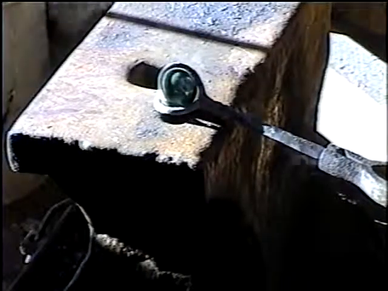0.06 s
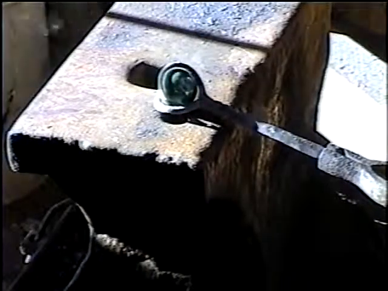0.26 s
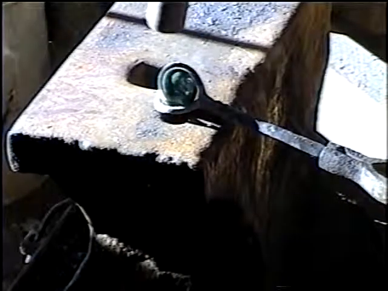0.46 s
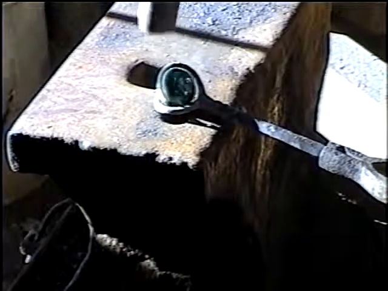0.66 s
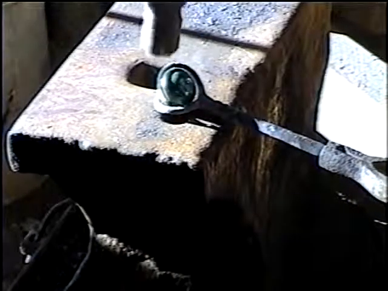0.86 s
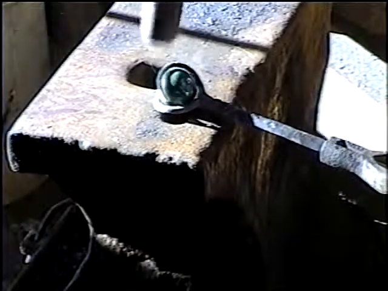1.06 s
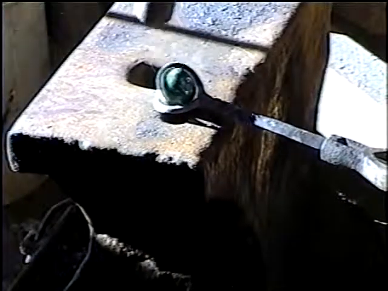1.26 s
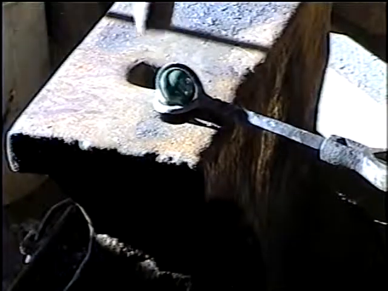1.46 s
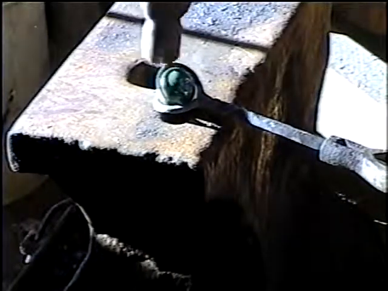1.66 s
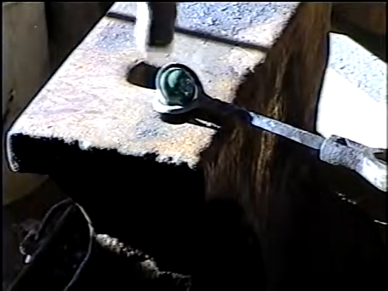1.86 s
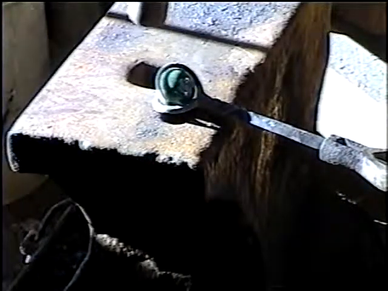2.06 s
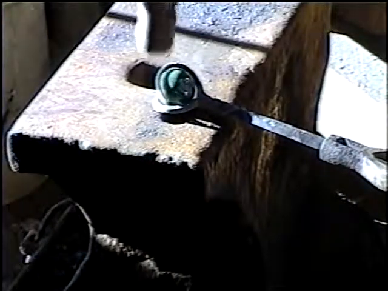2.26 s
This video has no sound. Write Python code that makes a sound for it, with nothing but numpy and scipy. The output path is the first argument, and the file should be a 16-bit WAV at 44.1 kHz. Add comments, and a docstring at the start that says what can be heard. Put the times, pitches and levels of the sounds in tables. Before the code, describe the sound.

Six ringing hammer clacks on a steel piece, with soft drip-like pips behind.

```python
"""A small workshop, heard from a camera microphone with its own hiss, mains hum and thin whine.
From the start, an uneven string of hollow pips near 1 kHz, perhaps water bubbling or dripping, runs
in the background over a low rumble. From 0.7 s a hammer in front taps a steel piece on an anvil six
times: the damped steel clacks, rings briefly and four times rattles back. One dull knock falls
before the last tap, and the pips carry on to the end."""
import sys
import numpy as np
from scipy import signal
from scipy.fft import rfft, irfft, next_fast_len
from scipy.io import wavfile
from scipy.ndimage import map_coordinates

SR = 44100
rng = np.random.default_rng(int(sys.argv[2]) if len(sys.argv) > 2 else 0)


def digitize_waveform(pressure):
    """Quantize a signal to 16-bit integers and store it at the path in sys.argv[1].

    Rows of a 2-D input are taken as channels; values are limited to [-1, 1].
    """
    field = np.atleast_2d(pressure).T
    bounded = np.clip(field, -1, 1)
    quanta = np.round(bounded * 32767).astype(np.int16)
    wavfile.write(sys.argv[1], SR, quanta)


N = 105840

# Spectrum of steel clacking on steel: frequency_hz, level_db
CLACK_SPECTRUM = [(60, -24), (200, -3.5), (400, -3.5), (800, -1), (1280, -5.5), (1750, -4.5), (2150, 2.5),
                  (2700, 0.5), (3450, -5), (4050, -4.5), (4650, -8.5), (5700, -8), (6800, -11.5),
                  (7600, -18), (16000, -20)]
# Hollow spectrum of the plops and the knock: frequency_hz, level_db
PLOP_SPECTRUM = [(100, -50), (300, -2), (620, 4), (850, -10.5), (1100, 1.5), (1350, -5), (1600, -11.5),
                 (2200, -16.5), (5000, -33)]


def amp(db):
    """Decibels to gain."""
    return 10 ** (np.asarray(db) / 20)


def along(points, hz):
    """Read (Hz, value) points on a log frequency axis."""
    frequencies, values = np.transpose(points)
    return np.interp(np.log(hz + 1), np.log(frequencies + 1), values)


def noise(spectrum, size):
    """Coloured noise of rms 1."""
    gain = amp(along(spectrum, np.fft.rfftfreq(size, 1 / SR)))
    coloured = irfft(rfft(rng.standard_normal(size)) * gain, size)
    return coloured / np.sqrt(np.mean(coloured ** 2) + 1e-20)


def causal(gain):
    """Minimum-phase impulse response: this gain, with no sound ahead of it."""
    cepstrum = irfft(np.log(np.maximum(gain, 1e-6)))
    cepstrum[1:len(cepstrum) // 2] *= 2
    cepstrum[len(cepstrum) // 2 + 1:] = 0
    return irfft(np.exp(rfft(cepstrum)))


def rise(t, tau_s):
    """Exponential attack."""
    return 1 - np.exp(-t / tau_s)


def fade(t, t60_s):
    """Exponential decay, 60 dB down at t60_s."""
    return amp(-60 * t / t60_s)


def wobble(size, knots_per_s):
    """A smooth random curve."""
    knots = rng.standard_normal(int(size * knots_per_s / SR) + 4)
    return map_coordinates(knots, [np.arange(size) * knots_per_s / SR])


def add(out, start_s, sound):
    """Mix a sound in at start_s."""
    i = max(round(start_s * SR), 0)
    out[i:i + len(sound)] += sound[:max(len(out) - i, 0)]


def camera_noise():
    """Hiss, hum, faint steady tones and a line-scan whine that flutters at the mains rate."""
    # Hiss spectrum: frequency_hz, level_db
    hiss_spectrum = [(100, -5), (2000, -7.5), (3700, 2), (5500, 3.5), (6800, 5), (8500, -1), (11000, -6),
                     (15500, -13)]
    # Mains hum and faint whines: pitch_hz, level_db
    steady_tones = [(60, -72), (1798, -77), (2520, -80), (7868, -81)]
    t = np.arange(N) / SR
    tones = sum(amp(db) * np.sin(2 * np.pi * hz * t) for hz, db in steady_tones)
    flutter = 1 + 0.15 * np.sin(2 * np.pi * 60 * t)
    whine = amp(-70) * flutter * np.sin(2 * np.pi * 15735 * t)
    return amp(-65) * noise(hiss_spectrum, N) + np.sqrt(2) * (tones + whine)


def rumble():
    """Low workshop room tone that swells a little midway."""
    # Room tone spectrum: frequency_hz, level_db
    spectrum = [(20, -11), (60, 0.5), (150, 2), (300, -2), (650, -4.5), (1000, -11.5), (1600, -12.5),
                (2500, -17.5), (5000, -33)]
    # Its swell: time_s, level_db
    swell = [(0, -59.5), (.3, -59), (.7, -53.5), (1.1, -54.5), (1.35, -51.5), (1.6, -56.5), (1.9, -54),
             (2.4, -58.5)]
    level_db = np.interp(np.arange(N) / SR, *np.transpose(swell))
    return amp(level_db) * noise(spectrum, N)


def pips():
    """Each pip swells into one hollow, wavering resonance, with a weak overtone and a soft plop."""
    # Background pips: time_s, level_db, pitch_hz
    events = [(0.0154, -44.5, 1036), (0.0485, -56, 1065), (0.0873, -45, 1040), (0.1187, -45, 1027),
              (0.152, -43, 1034), (0.2028, -31, 1030), (0.2526, -45.5, 1020), (0.3166, -41, 1055),
              (0.3615, -39.5, 1064), (0.3776, -39, 1035), (0.407, -41.5, 1048), (0.4317, -38, 1024),
              (0.4675, -49, 1024), (0.5215, -34, 1031), (0.5621, -43, 1036), (0.603, -42, 1028),
              (0.6453, -33, 1023), (0.7576, -46, 1090), (0.7813, -45.5, 1056), (0.824, -41.5, 1032),
              (0.864, -43, 1051), (0.8902, -34, 1064), (0.957, -33, 1040), (0.9878, -42, 1018),
              (1.0216, -41, 1073), (1.0462, -44.5, 1046), (1.0791, -38.5, 1057), (1.1418, -37.5, 1042),
              (1.2, -40.5, 1062), (1.2266, -43, 1052), (1.304, -43.5, 1032), (1.3282, -39.5, 1054),
              (1.3371, -56, 1053), (1.3913, -44.5, 1050), (1.4159, -44, 1062), (1.4659, -38, 1053),
              (1.4886, -39, 1102), (1.5773, -46, 1054), (1.5956, -53, 1060), (1.6329, -44.5, 1120),
              (1.6614, -43.5, 1060), (1.696, -43.5, 1120), (1.719, -53, 1077), (1.734, -43.5, 1077),
              (1.905, -38, 1076), (1.9603, -48.5, 1060), (2.026, -44.5, 1065), (2.1451, -43, 1070),
              (2.2236, -41, 1040), (2.276, -47.5, 1080), (2.3087, -47.5, 1060), (2.34, -38, 1035)]
    lead_s, rise_s, overtone_ratio = 0.00414, 0.0073, 1.46
    out, t = np.zeros(N), np.arange(SR // 5) / SR
    envelope = (1 - np.exp(-(t / rise_s) ** 2)) * fade(t, t60_s=0.052)
    for time_s, db, hz in events:
        phase = 2 * np.pi * hz * t + 0.27 * wobble(len(t), knots_per_s=170)
        tone = (np.sin(phase) + amp(-19) * np.sin(overtone_ratio * phase)) * envelope
        plop = noise(PLOP_SPECTRUM, len(t)) * rise(t, 0.0051) * fade(t, t60_s=0.088)
        add(out, time_s - lead_s, amp(db) * (amp(9) * tone + amp(-11) * plop))
    return out


def knock():
    """One dull knock among the pips."""
    out, t = np.zeros(N), np.arange(SR // 5) / SR
    burst = noise(PLOP_SPECTRUM, len(t)) * rise(t, 0.0013) * fade(t, t60_s=0.19)
    add(out, start_s=1.903, sound=amp(-47) * burst)
    return out


def room_tail(t):
    """The clack scattered by the workshop, each band dying at its own speed."""
    # Workshop reverberation: frequency_hz, t60_s
    decay_times = [(200, 0.12), (1000, 0.39), (2800, .33), (5500, 0.37), (9000, 0.44)]
    hz, frame_s, bands = signal.stft(noise(CLACK_SPECTRUM, len(t)), SR, nperseg=256)
    bands *= fade(frame_s, along(decay_times, hz)[:, None])
    tail = signal.istft(bands, SR, nperseg=256)[1][:len(t)]
    return tail * rise(t, 0.007)


def thud(t):
    """A firm blow pushes the whole anvil into its block."""
    # Modes of the anvil on its block: pitch_hz, level_db, t60_s
    block_modes = [(183, -13.5, 0.034), (388, -7, 0.035), (776, -2, 0.016)]
    return sum(amp(db) * fade(t, t60_s) * np.sin(2 * np.pi * hz * t) for hz, db, t60_s in block_modes)


def ring(t, low_db, middle_db, high_db):
    """Steel modes, wavering a little in the room; the spot that is struck sets their balance."""
    # Modes of hammer, piece and anvil: pitch_hz, level_db, t60_s
    steel_modes = [(1504, 0.5, 0.17), (1890, -16.5, 0.2), (2096, -9.5, 0.15), (2480, -60, 0.89),
                   (2570, -15, 0.37), (2722, -15, 0.19), (3130, -28, 0.084), (3220, -12.5, 0.39),
                   (3664, -7, 0.26), (5170, -11.5, 0.18), (5800, -22, 0.28), (5720, -14.5, 0.18),
                   (5806, -12.5, 0.24), (6600, -22.5, 0.2)]
    spot_balance = [(1600, low_db), (1900, 0.0094), (2900, 0.01), (3650, middle_db), (5000, high_db)]
    out = np.zeros(len(t))
    for hz, db, t60_s in steel_modes:
        phase = 2 * np.pi * (hz * t + rng.random()) + 0.55 * wobble(len(t), knots_per_s=70)
        level_db = db + along(spot_balance, hz) + rng.normal()
        out += amp(level_db) * fade(t, t60_s) * np.sin(phase)
    return out * rise(t, 0.00074)


def clack(t, crack_db, centre_hz, bass_db, treble_db):
    """A sharp crack, the dense short ring of the clamped steel, and the room, coloured for one tap."""
    peak_db, width_oct = 4, 0.24
    hz = np.fft.rfftfreq(len(t), 1 / SR)
    snap = causal(amp(along(CLACK_SPECTRUM, hz)))
    grit = 0.24 * noise(CLACK_SPECTRUM, len(t)) * fade(t, t60_s=0.0057)
    crack = snap / np.abs(snap).max() + grit
    body = noise(CLACK_SPECTRUM, len(t)) * fade(t, t60_s=0.06)
    impact = amp(crack_db) * crack + amp(1) * body + amp(-7.5) * room_tail(t)
    bump_db = peak_db * np.exp(-(np.log2((hz + 1) / centre_hz) / width_oct) ** 2)
    shelves_db = along([(700, bass_db), (2000, 0), (2800, 0), (4800, treble_db)], hz)
    return signal.fftconvolve(impact, causal(amp(bump_db + shelves_db)))[:len(t)]


def hammer():
    """Each tap touches, seats the piece on the anvil with a clack, and sometimes rattles back."""
    # Hammer blows: start_s, level_db, touch_lead_s, crack_db, clack_centre_hz, bass_db, treble_db,
    # low_modes_db, middle_modes_db, high_modes_db, thud_db
    taps = [(.7168, -36.5, 0.0022, 11.5, 2970, 1.5, 3, 3.5, -15, -3, -4),
            (0.9445, -35, 0.0033, 17, 2100, -2.5, 2, -18, -30, -5, -12),
            (1.2583, -37, 0.0031, 12, 2270, 1, 2, -6, 0, -6, -16),
            (1.5022, -32.5, 0.0012, -16, 2870, -2, 4, -20, 1, 3.5, -12),
            (1.7937, -37.5, 0.00073, -5, 2720, -0.5, 4, -10, -6, -7, -16),
            (2.0541, -30.5, .0019, 9.5, 2240, 4, -4, 1, -5.5, -13, 1.5)]
    # The piece rattling back: start_s, level_db, ping_hz, ping_db
    rebounds = [(0.751, -43, 2166, 2.5), (1.0113, -47, 4030, -8), (1.2747, -81, 2100, -9),
                (1.8291, -41, 2346, -1)]
    low_cut_hz, high_cut_hz, high_cut_order = 170, 6910, 17.6
    out, t = np.zeros(N), np.arange(SR // 2) / SR
    for start_s, db, lead_s, crack_db, centre_hz, bass_db, treble_db, *modes_db, thud_db in taps:
        blow = clack(t, crack_db, centre_hz, bass_db, treble_db)
        blow += amp(-1.5) * ring(t, *modes_db) + amp(thud_db) * thud(t)
        add(out, start_s, amp(db) * blow)
        touch = noise(CLACK_SPECTRUM, len(t)) * rise(t, 0.00016) * fade(t, t60_s=0.057)
        add(out, start_s - lead_s, amp(db - 6) * touch)
    for start_s, db, ping_hz, ping_db in rebounds:
        ping = amp(ping_db) * np.sin(2 * np.pi * ping_hz * t) * fade(t, t60_s=0.092)
        rattle = noise(CLACK_SPECTRUM, len(t)) * fade(t, t60_s=0.04)
        add(out, start_s, amp(db) * (rattle + ping))
    # The taps carry little bass and only a trace of the top treble.
    hz = np.fft.rfftfreq(len(t), 1 / SR)
    low_cut = hz ** 2 / np.hypot(hz ** 2, low_cut_hz ** 2)
    high_cut = 0.0078 + 1 / np.sqrt(1 + (hz / high_cut_hz) ** (2 * high_cut_order))
    return signal.fftconvolve(out, causal(low_cut * high_cut))[:N]


def scene():
    """Taps in front; pips, knock and rumble behind, in mono."""
    return (hammer() + pips() + knock() + rumble())[None]


def record(dry):
    """The camera adds its own noise and keeps nothing above 16 kHz."""
    size = next_fast_len(N + SR // 2)
    passband = np.fft.rfftfreq(size, 1 / SR) < 16000
    return irfft(rfft(dry + camera_noise(), size) * passband, size)[:, :N]


dry = scene()
out = record(dry)
digitize_waveform(out)
```